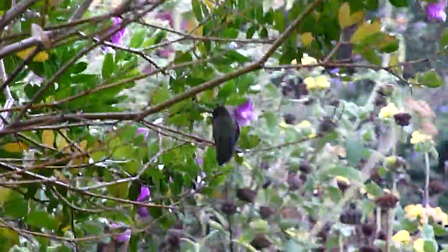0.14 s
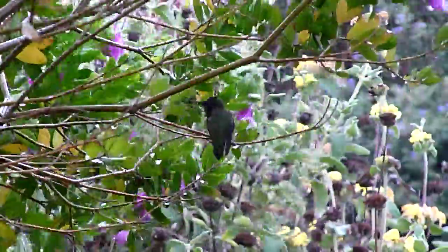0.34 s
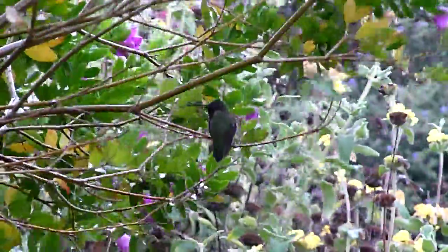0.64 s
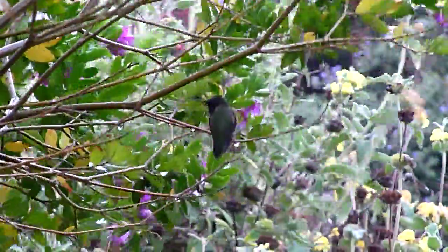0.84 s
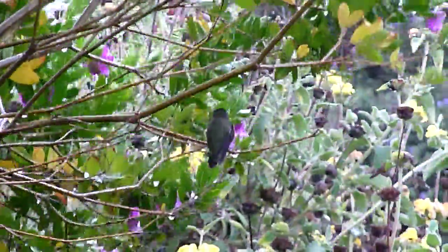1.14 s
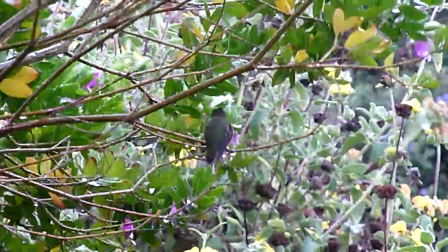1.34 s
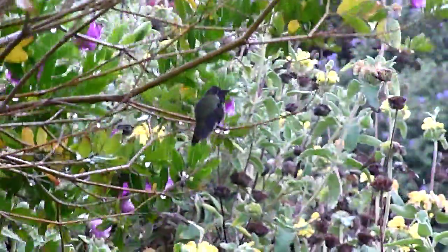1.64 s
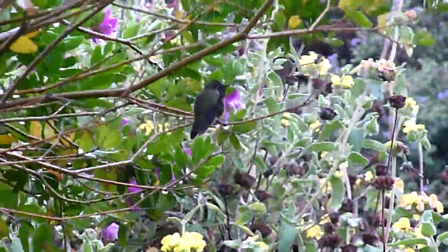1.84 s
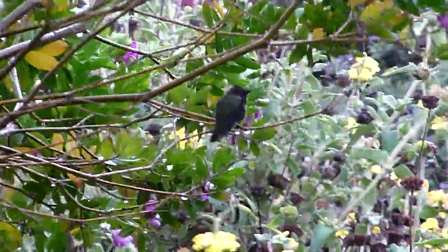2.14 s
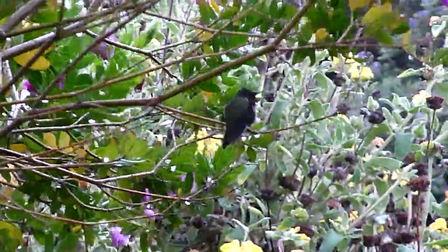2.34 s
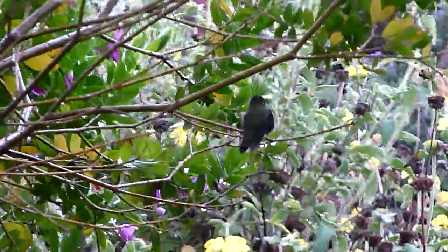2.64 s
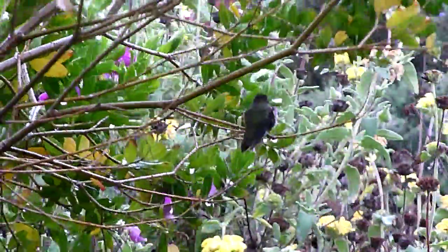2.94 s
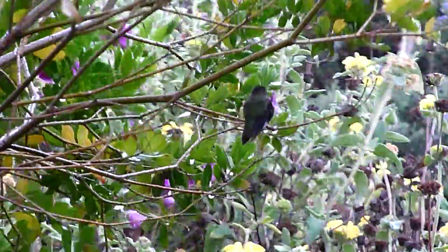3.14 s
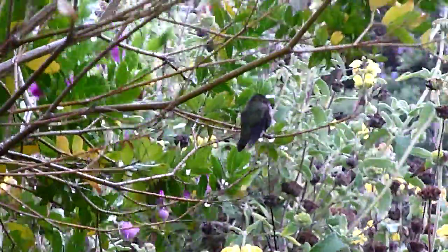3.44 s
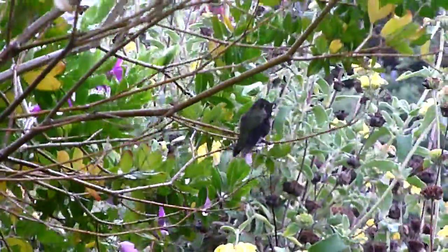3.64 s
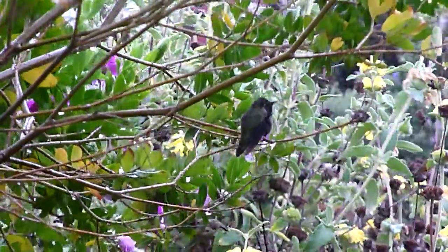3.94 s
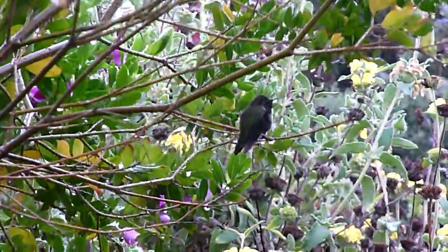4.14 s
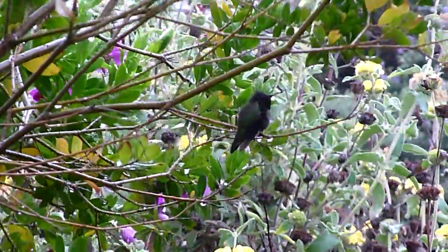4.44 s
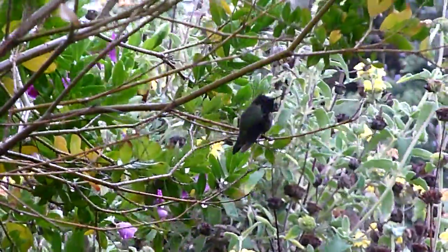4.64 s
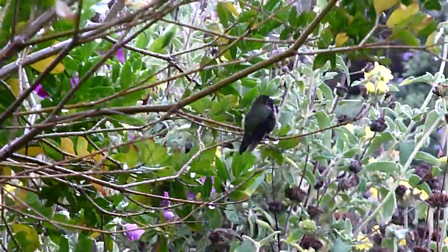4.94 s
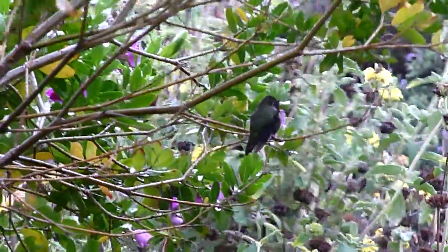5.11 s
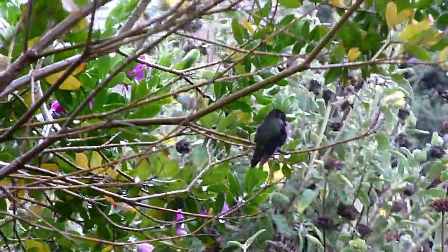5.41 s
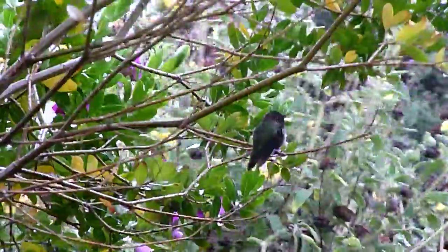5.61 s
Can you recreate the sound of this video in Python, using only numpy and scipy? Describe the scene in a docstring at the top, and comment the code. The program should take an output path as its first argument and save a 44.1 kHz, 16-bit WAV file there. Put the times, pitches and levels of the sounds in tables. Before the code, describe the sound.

A stovetop kettle hisses and chirps, then breaks into a fluttering whistle that drops to a lower note and slowly climbs.

```python
"""In a kitchen, a stovetop kettle comes to the boil. Steam leaves the spout cap as a hissing jet whose
eddies excite a fluttering whistle near 3 kHz. As the jet speeds up and sheds eddies faster, the whistle
flips to a lower note with a strong octave, which climbs with the eddy rate. The metal shell colours
the sound, reflections from the hard walls smear it, and the stove rumbles softly underneath."""
import sys
import numpy as np
from scipy import signal
from scipy.fft import rfft, irfft, next_fast_len
from scipy.io import wavfile

SR = 44100
rng = np.random.default_rng(int(sys.argv[2]) if len(sys.argv) > 2 else 0)


def wav_record(signal):
    """Record a signal, one row per channel, as 16-bit PCM in the file named by sys.argv[1]."""
    frames = np.transpose(np.atleast_2d(signal))
    bounded = np.clip(frames, -1, 1)
    # unit amplitude maps onto the largest positive 16-bit level
    quanta = np.round(bounded * 32767).astype(np.int16)
    wavfile.write(sys.argv[1], SR, quanta)


N = 254456
TIME = np.arange(N) / SR
BIN_HZ = np.fft.rfftfreq(1024, 1 / SR)
FRAME_TIMES = np.arange(N // 256 + 5) * 256 / SR
BAND_LIMIT_HZ = 8800

# Rumble of the stove and simmering water. Each row: frequency in Hz, relative level in dB.
RUMBLE_SPECTRUM = [(20, -31.5), (40, -20.5), (60, -2.5), (80, -10.5), (110, -7.5), (180, -12), (205, -4),
                   (300, -3), (365, 3), (470, -0.5), (530, 3.5), (655, -1.5), (690, -8.5), (1100, -13),
                   (3000, -23.5)]
# Course of the rumble. Each row: time in seconds, level in dB.
RUMBLE_LEVELS = [(0, -37), (1.5, -36.5), (2.2, -37), (2.9, -37.5), (3.1, -38.5), (4, -38.5), (4.7, -41),
                 (5.66, -42.5), (5.74, -37.5)]
# Likeness of the rumble at the two ears. Each row: frequency in Hz, correlation from 0 to 1.
RUMBLE_COHERENCE = [(50, 0.95), (250, 0.99), (600, .97), (1200, 0.79), (3000, .7)]
# Faint drones of the stove. Each row: centre in Hz, half-width in Hz, level in dB.
STOVE_DRONES = [(265.6, 19, -45.5), (335, 7.9, -51.5), (370.1, 3.2, -48.5), (607, 2, -52.5), (757, 6, -55),
                (865, 5.3, -57)]
# The two lowest tones. Each row: pitch in Hz, relative resting level in dB.
HUM_TONES = [(208.7, -49), (240, -48.5)]
# Their swells. Each row: start in seconds, length in seconds, pitch of the tone in Hz, lift in dB.
HUM_LIFTS = [(.3, .55, 240, 7.5), (0.349, 0.43, 208.7, 8.5), (.85, 0.63, 240, 12.5), (.87, 0.37, 208.7, 6),
             (1.755, .35, 208.7, 7), (2.395, .47, 208.7, 11.5), (2.982, 0.7, 208.7, 8.5),
             (4.239, 0.33, 208.7, 6.5), (4.28, 0.33, 240, 8.5), (5.1, 0.22, 240, 6.5)]
# Reverberation of the kitchen. Each row: frequency in Hz, time to decay by 60 dB in seconds.
REVERB_TIMES = [(300, 0.65), (2500, 0.29), (5000, 0.51), (8000, 0.17)]
# Resonances of the shell and spout. Each row: centre in Hz, bandwidth in Hz, gain in dB.
SHELL_MODES = [(2077, 87, 7), (2464, 13, 5.5), (2488, 18, -4), (2645, 18, 9.5), (3050, 66, 2),
               (3156, 42, 0), (3149, 29, 3), (3430, 12, -5.5), (3580, 32, 7), (4246, 34, 7), (4480, 50, -3),
               (4467, 31, 11.5), (4550, 8.8, 4.5), (5100, 35, 7), (5150, 99, -14), (6980, 77, 5.5)]
# Slow course of the jet. Each row: time in seconds, eddy rate in Hz, relative hiss level in dB.
JET_COURSE = [(0, 1240, -32.5), (.25, 1286, -35.5), (.34, 1409, -30), (1.35, 1395, -30.5),
              (1.39, 1532, -26), (1.775, 1512, -29), (1.82, 1624, -25), (2.69, 1632, -26),
              (2.88, 1823, -26.5), (3.012, 1846, -28), (3.026, 2239, -23), (3.12, 2070, -26),
              (3.15, 1778, -29.5), (3.235, 1857, -23.5), (3.26, 2166, -23), (4.05, 2320, -23),
              (4.65, 2412, -23.5), (4.95, 2556, -23.5), (5.77, 2588, -24.5)]
# Surges of the boil. Each row: start in seconds, length in seconds, rise of the eddy rate in Hz.
BOIL_SURGES = [(1.372, .14, 123.9), (1.6, .13, 40.02), (1.795, .065, 130), (1.92, .075, 141),
               (2.02, .07, 119.5), (2.241, 0.0615, 50), (2.346, 0.0505, 45), (2.445, .135, 176.6),
               (2.714, .1, 115.4), (2.832, 0.05003, 82.7), (3.005, .085, 130.1), (3.395, .1, 184.2),
               (3.526, .08, 125.7), (3.659, .23, 115.6), (4.117, .05, 159.9), (4.166, .075, 165.1),
               (4.343, .06, 144.7), (4.449, .05, 129.5), (4.736, .08, 65), (5.168, .1, 120.1),
               (5.295, .15, 159.5), (5.603, .06, 66.1), (5.705, .11, 139.2)]
# Hiss of a slow and of a fast jet. Each row: frequency in Hz, relative level in dB.
SLOW_JET_SPECTRUM = [(300, -21.5), (900, -11.5), (1300, -7), (1800, -5.5), (2050, -4.5), (2700, -7),
                     (3100, 9), (3300, 3.5), (3570, 5.5), (3900, -2), (4250, 3), (5500, -0.5), (6700, -8),
                     (7600, -26)]
FAST_JET_SPECTRUM = [(300, -38), (1000, -21), (1800, -17.5), (2200, -13), (2850, -4.5), (3140, 0.5),
                     (3400, -3), (3900, -1.5), (4500, -3.5), (5600, -3), (6600, -3), (7200, -13),
                     (7800, -8)]
# Humps in the hiss. Each row: multiple of the eddy rate, Gaussian width in Hz, unscaled height in dB.
EDDY_HUMPS = [(1.002, 236, 15), (1.478, 224.4, -3), (1.908, 173.7, 14.5), (3.02, 151, 8.5), (4.0, 307, 0.5)]
# Response of the first note to the jet. Each row: eddy rate in Hz, pitch in Hz, relative level in dB.
FIRST_NOTE_RESPONSE = [(1410, 2970, -54.5), (1495, 3020, -24), (1648, 3165, -20), (1859, 3470, -17.5),
                       (2070, 3520, -36.5), (2250, 3700, -60.5)]
# Chirps of the first note, when the jet is too slow or too fast to hold it.
# Each row: start in seconds, length before the fall in seconds, pitch in Hz, relative level in dB.
FIRST_NOTE_CHIRPS = [(0, 0.0067, 2993, -31), (0.388, 0.033, 3000, -25.5), (0.76, 0.032, 2885, -29),
                     (0.848, 0.0448, 3052, -24.5), (0.932, 0.022, 2896, -30.5), (1.119, 0.027, 3010, -26),
                     (1.167, 0.025, 2962, -24), (1.281, 0.073, 2960, -25.5), (4.022, .045, 3817, -18.5)]
# Response of the second note. Each row: eddy rate in Hz, relative levels of note and octave in dB.
SECOND_NOTE_RESPONSE = [(1890, -54, -66.5), (1916, -39.5, -53), (2080, -26.5, -21.5), (2350, -23.5, -22),
                        (2380, -23, -18.5), (2720, -21, -19)]
# Treble response of the microphone. Each row: frequency in Hz, gain in dB.
MICROPHONE_RESPONSE = [(6900, -0.5), (7400, -3), (7750, -17), (8050, -28), (8400, -23.5), (8800, -24.5)]


def gain_of(db):
    """Amplitude ratio for a level in decibels."""
    return 10 ** (np.asarray(db) / 20)


def unit_rms(x):
    """Normalises a signal to an rms of one."""
    return x / np.sqrt(np.mean(x ** 2) + 1e-20)


def spectrum_at(rows, hz):
    """Interpolates a spectrum on a logarithmic frequency axis."""
    frequencies, values = np.transpose(rows)
    return np.interp(np.log(hz + 1), np.log(frequencies + 1), values)


def follow(rows, at):
    """Interpolates a table's other columns along its first."""
    axis, *columns = np.transpose(rows)
    return [np.interp(at, axis, column) for column in columns]


def filtered(x, response):
    """Linear filtering: multiplies the spectrum of x by a frequency response."""
    size = next_fast_len(N + 4096)
    return irfft(rfft(x, size) * response(np.fft.rfftfreq(size, 1 / SR)), size)[..., :N]


def wander(rate_hz):
    """Random fluctuation of unit rms, low-passed at rate_hz."""
    return unit_rms(filtered(rng.standard_normal(N), lambda f: 1 / (1 + (f / rate_hz) ** 4)))


def narrow_noise(hz, half_width_hz):
    """Noise of unit rms, concentrated in one resonance peak."""
    return unit_rms(filtered(rng.standard_normal(N), lambda f: 1 / (1 + ((f - hz) / half_width_hz) ** 2)))


def arch(t, start, length, skew=1):
    """Half-sine envelope; with skew below one it rises faster than it falls."""
    return np.sin(np.pi * np.clip((t - start) / length, 0, 1) ** skew)


def stove():
    """Partial coherence: a low rush, almost the same at both ears, with narrow-band drones."""
    def coherence(f):
        return spectrum_at(RUMBLE_COHERENCE, f)

    left, independent = rng.standard_normal((2, N))
    right = filtered(left, coherence) + filtered(independent, lambda f: np.sqrt(1 - coherence(f) ** 2))
    rush = filtered([left, right], lambda f: gain_of(spectrum_at(RUMBLE_SPECTRUM, f)) * (f < BAND_LIMIT_HZ))
    envelope = gain_of(follow(RUMBLE_LEVELS, TIME)[0])
    drones = sum(gain_of(db) * narrow_noise(hz, half_width) for hz, half_width, db in STOVE_DRONES)
    return envelope * unit_rms(rush) + unit_rms(envelope) * drones


def hum(level_db=-1, waver=0.014, throb_db=3):
    """Slow frequency and amplitude modulation makes two low tones waver, swell and fade."""
    tones = np.zeros(N)
    for hz, rest_db in HUM_TONES:
        swell_db = sum(lift_db * arch(TIME, start, length)
                       for start, length, tone_hz, lift_db in HUM_LIFTS if tone_hz == hz)
        phase = 2 * np.pi * np.cumsum(hz * (1 + waver * wander(rate_hz=11.3))) / SR
        db = level_db + rest_db + swell_db + throb_db * wander(rate_hz=6.9)
        tones += np.sqrt(2) * gain_of(db) * np.sin(phase)
    return tones


def kitchen(x, direct_db=-2, coherence=0.48, balance_db=0.5, echo_count=1200):
    """Reverberation: dense wall reflections decay exponentially, partly shared by the two channels."""
    # One reflection of random sign falls in each slot of 20 samples.
    delays = 90 + 20 * np.arange(echo_count) + rng.integers(0, 20, (2, echo_count))
    reflections = np.zeros((2, SR * 3 // 5))
    np.put_along_axis(reflections, delays, rng.choice([-1., 1.], delays.shape), 1)
    hz, t, spectra = signal.stft(reflections, SR, nperseg=256)
    decay = gain_of(-60 * t / spectrum_at(REVERB_TIMES, hz)[:, None])
    tails = signal.istft(spectra * decay, SR, nperseg=256)[1]
    left, independent = tails / np.linalg.norm(tails[0])
    right = coherence * left + np.sqrt(1 - coherence ** 2) * independent
    echoes = signal.fftconvolve(x[None], np.array([left, right]), axes=1)[:, :N]
    direct = gain_of(direct_db)
    mix = (direct * x + echoes) / np.sqrt(direct ** 2 + (1 + coherence) / 2)
    return mix * gain_of([[balance_db], [-balance_db]])


def shell(x):
    """Modal filtering: the metal body lifts or dips whatever passes over its resonances."""
    return filtered(x, lambda f: 1 + sum((gain_of(db) - 1) / (1 + 2j * (f - hz) / width)
                                         for hz, width, db in SHELL_MODES))


def jet(t, lead_s=0.013):
    """Vortex shedding quickens with jet speed. Returns eddy rate, the surges' part of it, hiss level."""
    ahead = t + lead_s  # the jet changes before the room has filled with its new note
    steady_hz, hiss_db = follow(JET_COURSE, ahead)
    surge_hz = sum(rise * arch(ahead, start, length, skew=0.8) for start, length, rise in BOIL_SURGES)
    return steady_hz + surge_hz, surge_hz, hiss_db


def spout_ring():
    """Forced resonance: the spout murmurs above the climbing whistle, louder the faster the jet."""
    eddy_hz, _, _ = jet(TIME)
    db = np.interp(eddy_hz, [1920, 2592], [-53.5, -31.5])
    return gain_of(db) * narrow_noise(hz=3140, half_width_hz=55)


def steam_hiss(level_db=-2, flicker_db=2):
    """Turbulence radiates broadband noise, humped near multiples of the eddy rate."""
    eddy_hz, _, hiss_db = jet(FRAME_TIMES[:, None])
    speed = np.clip((eddy_hz - 1580) / 700, 0, 1)
    colour_db = (1 - speed) * spectrum_at(SLOW_JET_SPECTRUM, BIN_HZ)
    colour_db += speed * spectrum_at(FAST_JET_SPECTRUM, BIN_HZ)
    hump_scale = np.interp(speed, [0, 1], [0.95, 0.52])  # a faster jet has flatter humps
    for multiple, width, hump_db in EDDY_HUMPS:
        colour_db += hump_scale * hump_db * np.exp(-0.5 * ((BIN_HZ - multiple * eddy_hz) / width) ** 2)
    magnitude = gain_of(colour_db) * (BIN_HZ < BAND_LIMIT_HZ)
    magnitude /= np.linalg.norm(magnitude, axis=1, keepdims=True)
    noise = rng.standard_normal(magnitude.shape) + 1j * rng.standard_normal(magnitude.shape)
    hiss = unit_rms(signal.istft((magnitude * noise).T, nperseg=1024, noverlap=768)[1][:N])
    db = level_db + np.interp(TIME, FRAME_TIMES, hiss_db[:, 0]) + flicker_db * wander(rate_hz=40)
    return hiss * gain_of(db)


def flutter(pitch, sway, sway_hz, shiver, shiver_hz, throb_db):
    """Turbulence modulates a jet tone in frequency and amplitude. Returns phase and envelope."""
    hz = pitch * (1 + sway * wander(sway_hz) + shiver * wander(shiver_hz))
    envelope = unit_rms(gain_of(throb_db * wander(rate_hz=113)))
    return 2 * np.pi * np.cumsum(hz) / SR, envelope


def first_note(rise_s=0.01, fall_s=0.01826, sag_hz_per_s=596):
    """Mode locking: a range of eddy rates holds the note; outside it, chirps. Returns pitch and level."""
    pitch, db = follow(FIRST_NOTE_RESPONSE, jet(TIME)[0])
    for start, length, hz, peak_db in FIRST_NOTE_CHIRPS:
        age = TIME - start
        gate = np.clip(np.minimum(age / rise_s, 1 - (age - length) / fall_s), 0, 1)
        chirp_db = peak_db + 20 * np.log10(gate + 1e-9)
        pitch = np.where(chirp_db > db, hz - sag_hz_per_s * (age - length / 2), pitch)
        db = np.maximum(db, chirp_db)
    return pitch, db


def first_whistle(level_db=-0.5):
    """Flow-excited resonance: clean with a clear octave while weak, unsteady when blown harder."""
    pitch, db = first_note()
    drive = np.clip((db + 27) / 7, 0, 1)
    shiver = np.interp(drive, [0, 1], [0.012, 0.022])
    phase, envelope = flutter(pitch, sway=0.00981, sway_hz=60.8, shiver=shiver, shiver_hz=186, throb_db=3.5)
    octave = gain_of(np.interp(drive, [0, 1], [-7, -17])) * np.sin(2 * phase)
    return gain_of(db + level_db) * envelope * np.sqrt(2) * (np.sin(phase) + octave)


def second_whistle(surge_db_per_hz=0.024, sputter_db=2):
    """Vortex tone: the pitch follows the eddy rate and steadies with speed; surges bring out the octave."""
    pitch, surge_hz, _ = jet(TIME)
    db, octave_db = follow(SECOND_NOTE_RESPONSE, pitch)
    shiver = np.interp(pitch, [2330, 2520], [0.021, 0.012])
    phase, envelope = flutter(pitch, sway=0.00872, sway_hz=60, shiver=shiver, shiver_hz=177.3, throb_db=2)
    spurts_db = surge_db_per_hz * surge_hz + sputter_db * wander(rate_hz=24.9)
    harmonics_db = [db - 2.2, octave_db - 5 + spurts_db, db - 14]
    tone = sum(gain_of(level) * np.sin(k * phase) for k, level in enumerate(harmonics_db, start=1))
    return envelope * np.sqrt(2) * tone


def scene(stove_balance_db=0.27):
    """Superposition: the kettle and its reverberation add to the rumble of the stove."""
    background = (stove() + hum()) * gain_of([[stove_balance_db], [-stove_balance_db]])
    kettle = shell(first_whistle() + second_whistle() + steam_hiss()) + spout_ring()
    return background + kitchen(kettle)


def record(dry):
    """Low-pass filtering: the microphone's falling treble, then the band limit."""
    dulled = filtered(dry, lambda f: gain_of(spectrum_at(MICROPHONE_RESPONSE, f)))
    low_pass = signal.firwin(511, BAND_LIMIT_HZ, window=("kaiser", 9), fs=SR)
    return signal.oaconvolve(dulled, low_pass[None], "same")


dry = scene()
out = record(dry)
wav_record(out)
```